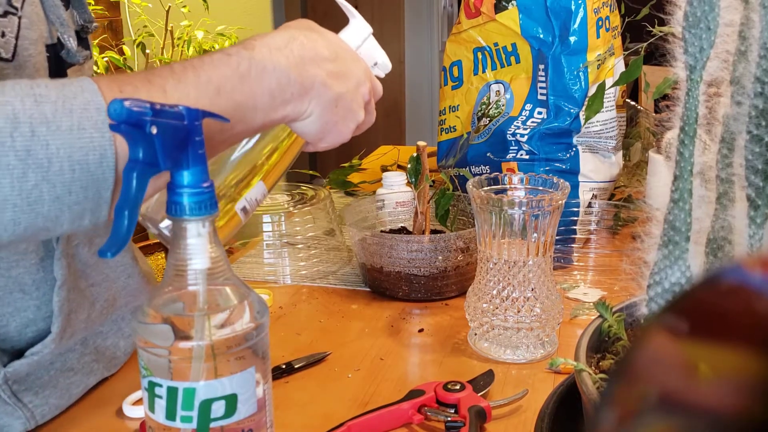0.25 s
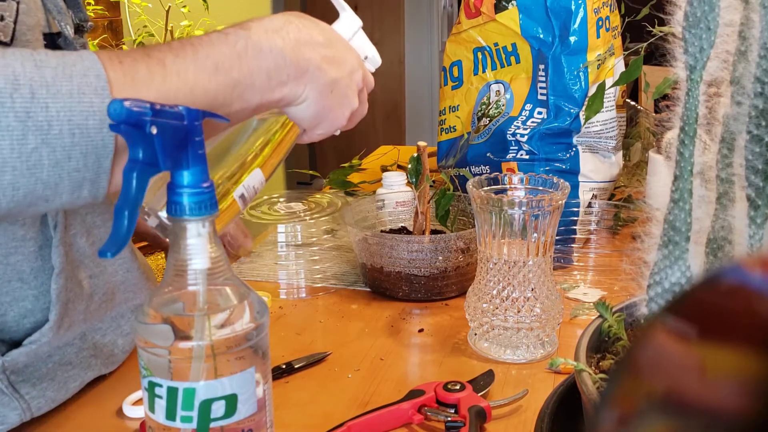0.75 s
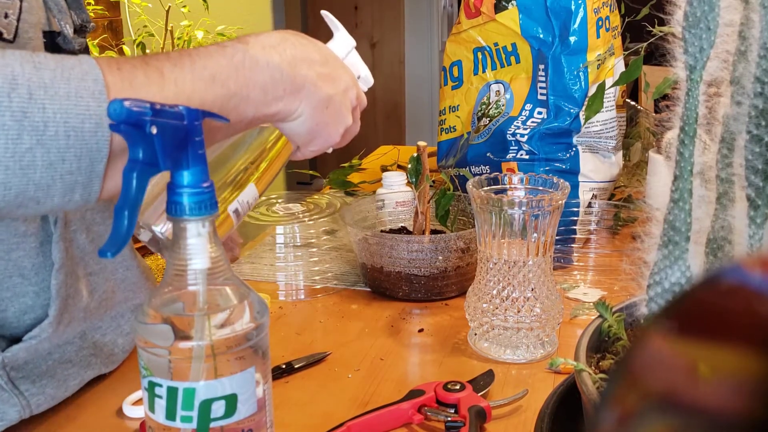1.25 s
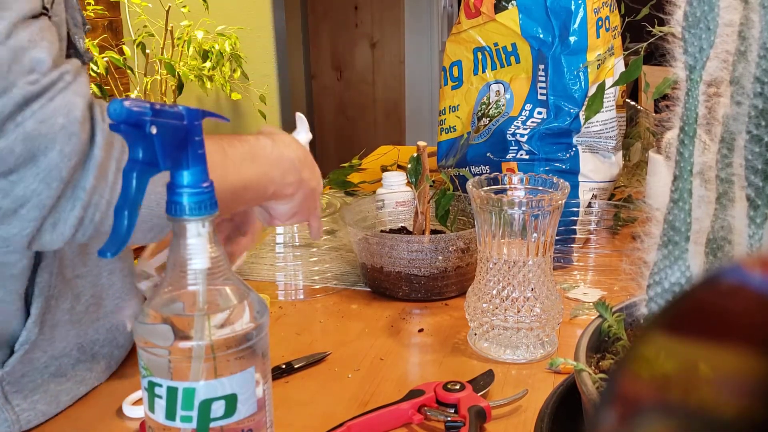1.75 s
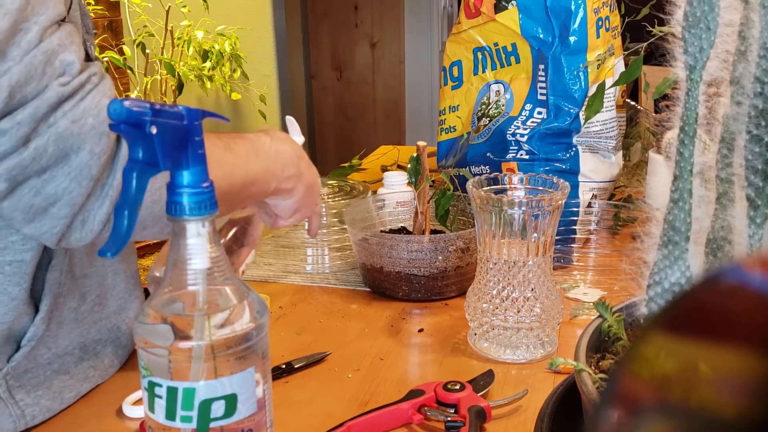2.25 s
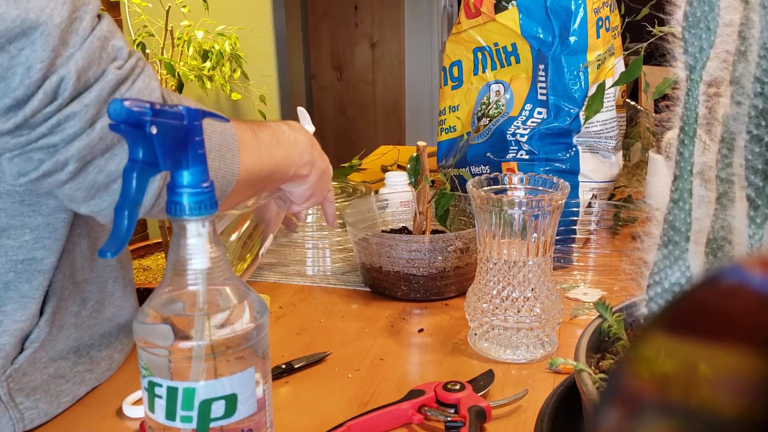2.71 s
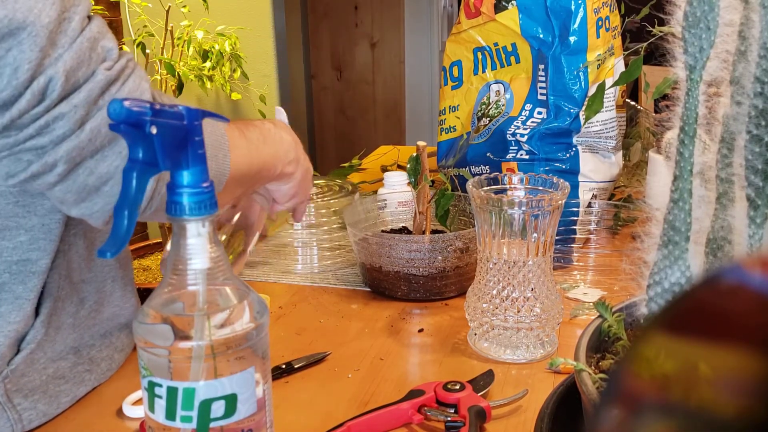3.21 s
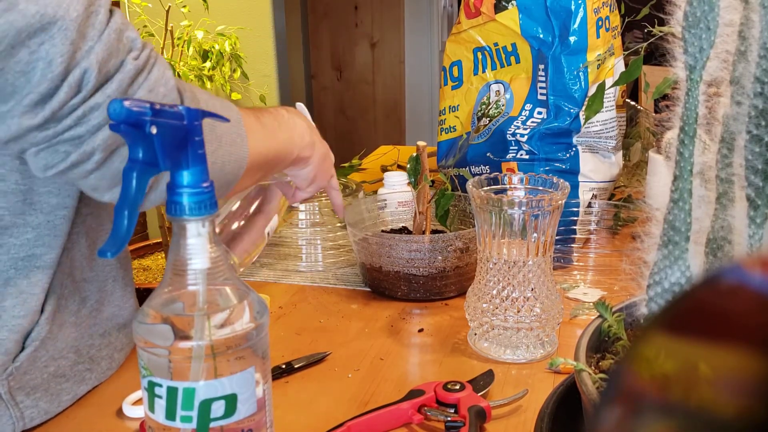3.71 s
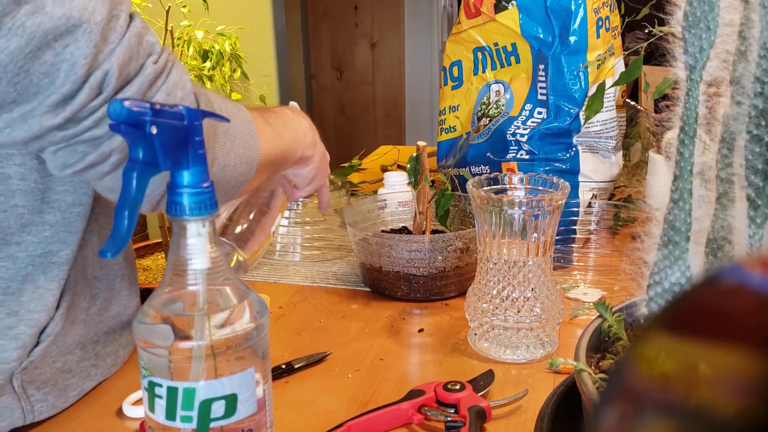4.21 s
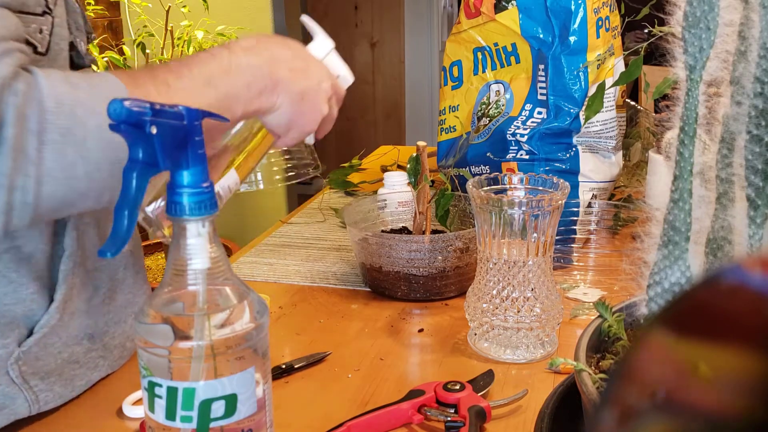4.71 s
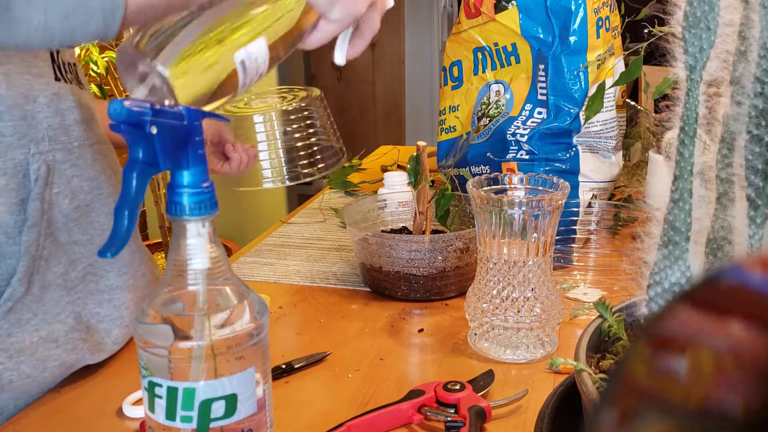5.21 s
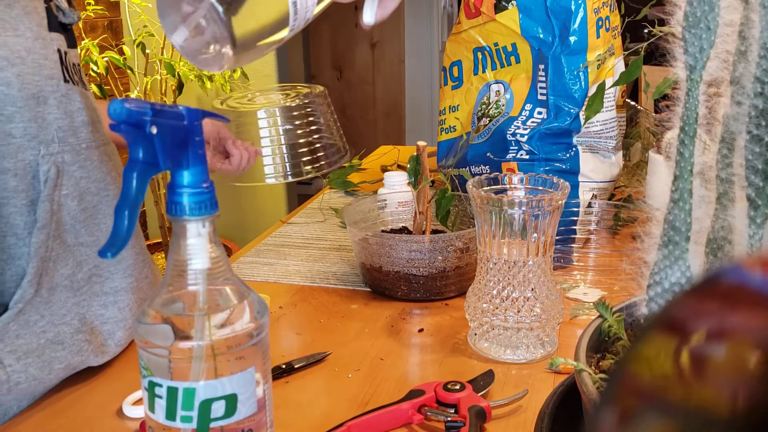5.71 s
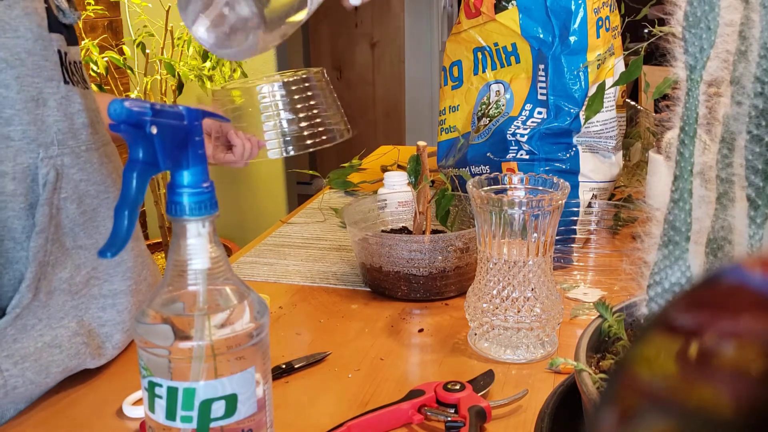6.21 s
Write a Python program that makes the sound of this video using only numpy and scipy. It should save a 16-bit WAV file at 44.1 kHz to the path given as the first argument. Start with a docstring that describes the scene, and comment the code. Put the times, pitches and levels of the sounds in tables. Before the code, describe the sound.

Close by in a small room, a thin plastic lid is dragged over a mat on a table, scraping and knocking with a light, hollow sound while a hand slides over it. The knocks build to a sharp clatter, then thin out. After a faint, breathy squeak, a trigger bottle sprays six quick hisses of mist, with pump ticks and a slight patter of droplets. A low appliance hum runs underneath.

```python
"""A table in a small room, heard from close by through two microphone ports, over a low appliance hum.
From the start a thin plastic lid is dragged over a mat and knocked about, ringing its walls, the air
under it and the table; a hand slides on it, and the hardest knocks come between 2 and 3.2 s.
Near 4.7 s comes a faint, breathy squeak. From 5 s a trigger bottle mists the lid six times: the pump
ticks, the nozzle hisses, droplets patter and the liquid sloshes once. The room answers each sound."""
import sys
import numpy as np
from scipy import signal
from scipy.fft import rfft, irfft
from scipy.io import wavfile
from scipy.ndimage import uniform_filter1d

SR = 44100
rng = np.random.default_rng(int(sys.argv[2]) if len(sys.argv) > 2 else 0)


def store_wav(level_fs):
    """Save 16-bit WAV to argv[1]."""
    pcm = np.round(np.clip(np.atleast_2d(level_fs), -1, 1) * 32767)
    wavfile.write(sys.argv[1], SR, pcm.T.astype(np.int16))


N = 284489
TIME_S = np.arange(N) / SR


def amp(db):
    return 10 ** (np.asarray(db) / 20)


def unit_rms(x):
    return x / np.sqrt(np.mean(x ** 2) + 1e-20)


def curve_at(points, hz):
    """Read a curve along a logarithmic frequency axis."""
    freq_hz, value = np.transpose(points)
    return np.interp(np.log(hz + 1), np.log(freq_hz + 1), value)


def colour(x, spectrum):
    """Causal filter with the given dB spectrum; returns one row a channel."""
    log_gain = np.log(amp(curve_at(spectrum, np.abs(np.fft.fftfreq(4096, 1 / SR)))))
    taps = np.fft.ifft(np.exp(log_gain - 1j * signal.hilbert(log_gain).imag)).real[:2048]
    return signal.oaconvolve(np.atleast_2d(x), taps[None], axes=1)[:, :N]


def ring(x, modes):
    """Sum of damped modes, neighbours of opposite sign."""
    out = np.zeros(len(x))
    for k, (hz, width_hz, db) in enumerate(modes):
        r = np.exp(-np.pi * width_hz / SR)
        feedback = [1, -2 * r * np.cos(2 * np.pi * hz / SR), r * r]
        out += (-1) ** k * amp(db) * signal.lfilter([1 - r, 0, r - 1], feedback, x)
    return out


def grit(spread_db, clump_samples):
    """Noise whose strength jumps about in short clumps."""
    clumps = unit_rms(uniform_filter1d(rng.standard_normal(N), clump_samples))
    return unit_rms(rng.standard_normal(N) * amp(spread_db * clumps))


def envelope(curves, fade_s=0.0053):
    """Gain over time from a list of dB curves, silent outside them."""
    out = np.zeros(N)
    for time_s, level_db in map(np.transpose, curves):
        fade = np.clip(np.minimum(TIME_S - time_s[0], time_s[-1] - TIME_S) / fade_s, 0, 1)
        out += fade * amp(np.interp(TIME_S, time_s, level_db))
    return out


def peak(at_s, rise_db_per_s, fall_db_per_s):
    """Gain that climbs to 1 at a moment and then dies."""
    t = TIME_S - at_s
    return amp(np.where(t < 0, rise_db_per_s * t, -fall_db_per_s * t))


def ramp(start_s, rise_s):
    return np.clip((TIME_S - start_s) / rise_s, 0, 1)


# how alike diffuse sound is at the two ports: freq_hz, likeness
PORT_LIKENESS = [(150, 0.96), (500, 0.6), (1200, 0.25), (3000, 0)]

def diffuse_pair(left, other):
    """The ports sit close together, so the right shares the left's bass but not its treble."""
    likeness = np.clip(curve_at(PORT_LIKENESS, np.fft.rfftfreq(len(left), 1 / SR)), 0, 1)
    right = irfft(likeness * rfft(left) + np.sqrt(1 - likeness ** 2) * rfft(other), len(left))
    return np.array([left, right])


# room tone spectrum: freq_hz, density_db
RUMBLE = [(38, -19.5), (65, -14), (76, -15), (102, -7.5), (140, -13), (190, -14.5), (300, -21),
          (560, -36.5), (2000, -55.5), (7000, -58), (11000, -59), (14000, -48.5)]
# steady motor tones, close neighbours beating: pitch_hz, peak_db
MOTORS = [(50.9, -63), (56.48, -56.5), (59.11, -61), (120.03, -56.5)]
RUMBLE_DB, THROB_S = -55.5, 0.41  # at the throb all the tones are in phase

def appliance_hum():
    """Low drone of the house behind everything: motor tones over a slowly swelling rumble."""
    left, other = (colour(rng.standard_normal(N), RUMBLE)[0] for _ in range(2))
    swell_db = 2.2 * unit_rms(uniform_filter1d(rng.standard_normal(N), size=9000))
    tones = sum(amp(db) * np.cos(2 * np.pi * hz * (TIME_S - THROB_S)) for hz, db in MOTORS)
    return amp(RUMBLE_DB + swell_db) * unit_rms(diffuse_pair(left, other)) + tones


# modes of the lid's walls: pitch_hz, width_hz, level_db
WALL_MODES = [(1384, 220, 1.5), (1735, 310, 0.5), (2310, 660, 1.5), (2640, 430, 3), (3474, 1010, -1),
              (4045, 490, -1.5), (6804, 6600, -11.5)]
# modes of the air under the lid: pitch_ratio, width_hz, level_db
HOLLOW_MODES = [(.87, 97.1, 1.5), (1.004, 76.2, 5.5), (1.17, 90.3, -3.5), (1.501, 140.4, -6)]
# spectrum of the mat's fine hiss: freq_hz, density_db
MAT_HISS = [(3000, -31.5), (6500, -4.5), (16000, 4.5)]
# stretches of faint, even hiss from the mat: start_s, length_s, level_db
RUSTLES = [(0.002, 0.19, -61.5), (0.75, 1.55, -58), (2.194, 0.36, -54)]
# strokes of the lid over the mat: peak_s, rise_s, fall_s, scrape_db, hiss_db, drone_db
DRAGS = [(0.002, 0.0093, 0.06, -46, -72, -41.5), (0.344, 0.004, 0.093, -65, -86, -50.5),
         (0.409, 0.067, 0.14, -49, -52, -45), (0.48, 0.22, 0.012, -74, -49, -60),
         (0.744, 0.015, 0.027, -53, -50.5, -41.5), (1.34, 0.079, 0.097, -65, -56, -53),
         (1.6, 0.16, 0.056, -64, -56, -55.5), (1.844, 0.029, 0.017, -44.5, -29.5, -49),
         (1.903, 0.083, 0.07, -49.5, -75, -47.5), (1.998, 0.044, 0.03, -47.5, -47, -53),
         (2.47, 0.017, 0.32, -74.5, -53, -73.5), (2.627, 0.028, 0.017, -41.5, -31.5, -57),
         (2.72, 0.095, 0.031, -54, -50, -45), (3.468, 0.012, 0.035, -97.5, -54.5, -91),
         (3.908, 0.029, 0.21, -61, -63, -47.5), (3.967, 0.043, 0.02, -54, -60, -60),
         (4.249, 0.22, 0.035, -49.5, -50, -54), (4.331, 0.019, 0.012, -51, -37.5, -55),
         (4.42, 0.022, 0.055, -52, -47, -53), (4.488, 0.094, 0.0083, -57.5, -50, -58)]
STROKE_DB, DRONE_HZ = 20, 430  # a stroke gains STROKE_DB over rise_s and loses it over fall_s

def lid_drags():
    """Fibres of the mat pluck the rim: the walls scrape, a hiss rides on top, the hollow drones."""
    scrape_gain, hiss_gain, drone_gain = sum(
        amp(levels_db)[:, None] * peak(peak_s, STROKE_DB / rise_s, STROKE_DB / fall_s)
        for peak_s, rise_s, fall_s, *levels_db in DRAGS)
    rustle_gain = sum(amp(db) * (ramp(start_s, 0.0069) - ramp(start_s + length_s, 0.0082))
                      for start_s, length_s, db in RUSTLES)
    scrape = unit_rms(ring(grit(3, 120), WALL_MODES))
    hiss = unit_rms(colour(grit(0.54, 120), MAT_HISS)[0])
    drone = unit_rms(ring(grit(3, 400), np.array(HOLLOW_MODES) * [DRONE_HZ, 1, 1]))
    return scrape * scrape_gain + hiss * np.hypot(hiss_gain, rustle_gain) + drone * drone_gain


def blow(contact_s, size):
    """A sharp tap; the contact then builds up in a quick chatter and dies away."""
    age = np.arange(size) / SR / contact_s
    return signal.unit_impulse(size) + rng.standard_normal(size) * age * np.exp(1 - age) / 5


# modes of the table top under the mat: pitch_hz, width_hz, level_db
TABLE_MODES = [(188.9, 9.8, 4.5), (221, 160, -2)]
# knocks on the lid: start_s, blow_db, thud_db, hollow_hz, crack_db
KNOCKS = [(0.3444, -46.5, -61, 470, -63), (0.4208, -31, -25.5, 425, -58), (0.4513, -29.5, -30.5, 441, -21),
          (0.7996, -33, -31.5, 422, -60), (0.854, -31.5, -34, 547, -70), (1.2997, -43.5, -52, 656, -37),
          (2.0783, -10, -26, 444, -2.5), (2.1217, -8, -19.5, 468, -30.5), (2.165, -28.5, -18, 420, -33),
          (2.613, -32, -42.5, 700, -56), (2.6298, -29, -35, 573, -18), (2.7529, -10, -28.5, 545, -40),
          (2.759, -9, -22.5, 353, 1.5), (2.7719, -14.5, -18.5, 433, -12.5),
          (2.8105, -16.5, -18.5, 426.6, -10), (2.8606, -25.5, -26.5, 567, -5.5),
          (2.8899, -16, -16, 537, -0.5), (2.8983, -13, -19, 428, -20.5), (2.956, -27.5, -17.5, 557, -1.5),
          (2.9858, -20.5, -32, 606, -4.5), (3.1138, -11.5, -24.5, 415, -7), (3.1368, -15.5, -24, 431, -10),
          (3.1452, -16.5, -40.5, 393, 1), (3.1528, -16, -27.5, 453, -20.5), (4.0744, -13.5, -27, 468, -5.5),
          (4.3571, -32, -35.5, 790, -72.5)]
TABLE_DB = -13.5  # relative to the blow
FLEX, SPOT_DB = .03, 1.5  # the grip detunes the wall modes; each spot struck favours other modes
DULLING, DULL_ABOVE_HZ = 0.16, 1500  # soft blows lose treble: dB per octave for each dB of blow
CRINKLE, CRINKLE_S = .22, .004  # the thin wall snaps, then crinkles on more softly
CRACK_BODY = .75  # 0 thin, 1 full

def lid_knocks(size=4096):
    """Each blow rings walls, table and hollow, whose pitch is higher when the lid tips off the mat."""
    out = np.zeros(N + size)
    t, impulse = np.arange(size) / SR, signal.unit_impulse(size)
    table = ring(impulse, TABLE_MODES)
    for start_s, blow_db, thud_db, hollow_hz, crack_db in KNOCKS:
        force = blow(contact_s=0.0012, size=size)
        thud = ring(impulse, np.array(HOLLOW_MODES) * [hollow_hz, 1, 1])
        modes = []
        for hz, width_hz, db in WALL_MODES:
            flexed_hz = hz * rng.uniform(1 - FLEX, 1 + FLEX)
            dull_db = DULLING * blow_db * max(np.log2(hz / DULL_ABOVE_HZ), 0)
            modes.append((flexed_hz, width_hz, db + SPOT_DB * rng.standard_normal() + dull_db))
        walls = ring(force, modes)
        crinkle = CRINKLE * rng.standard_normal(size) * np.exp(-t / CRINKLE_S)
        crack = signal.lfilter([1, -2, 1], [1, -CRACK_BODY], force + crinkle)
        layers = [(blow_db, walls), (thud_db, thud), (crack_db, crack), (blow_db + TABLE_DB, table)]
        at = round(start_s * SR)
        out[at:at + size] += sum(amp(db) * x / abs(x).max() for db, x in layers)
    return out[:N]


# friction bands of the hand: pitch_hz, width_hz, level_db
SLIDE_BANDS = [(2003, 470, -2), (2490, 240, -2), (7200, 1500, -5.5)]
# course of the slide: time_s, level_db
SLIDE_LEVELS = [
    [(.74, -57), (.95, -68.5), (1.8, -63.5), (2.0, -60.5)],
]

def hand_slide():
    """A hand slides slowly over the lid: a thin, even hiss, passed twice through each band."""
    hiss = sum(ring(ring(grit(2.5, 2500), [band]), [band]) for band in SLIDE_BANDS)
    return unit_rms(hiss) * envelope(SLIDE_LEVELS)


# bands of the squeak: pitch_hz, width_hz, level_db
SQUEAK_BANDS = [(650, 34, 4), (1550, 150, -7)]
# course of the squeak: time_s, level_db
SQUEAK_LEVELS = [
    [(4.59, -70.5), (4.685, -57.5), (4.735, -83.5), (4.79, -91.5)],
]

def faint_breathy_squeak():
    """Near 4.7 s, a faint, breathy squeak in two bands, around 650 and 1550 Hz."""
    return unit_rms(ring(grit(2.36, 300), SQUEAK_BANDS)) * envelope(SQUEAK_LEVELS)


SPIT_FALL_DB_PER_S, SPIT_SPLUTTER_DB = 600, -20
JET_RISE_S, JET_SWELL_DB_PER_S, JET_STOP_DB_PER_S = 0.0049, 55, 378
SPLUTTER_SWELL_DB_PER_S, SPLUTTER_LAG_S = 68, 0.0051
DRIBBLE_DB, DRIBBLE_FALL_DB_PER_S = -8, 40  # splutter that trails on after the jet

def trigger_pull(start_s, spit_db, wait_s, jet_s, mist_db, splutter_db):
    """Gains of mist and splutter: a spit, a jet that swells until the piston stops, a dribble."""
    open_s = start_s + wait_s
    stop_s = open_s + jet_s
    spit = amp(spit_db) * ramp(start_s, 0.0025) * peak(start_s, 0, SPIT_FALL_DB_PER_S)
    mist = amp(mist_db) * ramp(open_s, JET_RISE_S) * peak(stop_s, JET_SWELL_DB_PER_S, JET_STOP_DB_PER_S)
    surge = peak(stop_s, SPLUTTER_SWELL_DB_PER_S, JET_STOP_DB_PER_S)
    dribble = amp(DRIBBLE_DB) * peak(stop_s, 0, DRIBBLE_FALL_DB_PER_S)
    splutter = amp(splutter_db) * ramp(open_s + SPLUTTER_LAG_S, JET_RISE_S) * (surge + dribble)
    return np.array([spit + mist, amp(SPIT_SPLUTTER_DB) * spit + splutter])


# spectra of the fine mist and the coarse splutter: freq_hz, density_db
MIST = [(3000, -30), (6000, -11), (11000, -2), (16000, 5.5)]
SPLUTTER = [(400, -1), (1200, 0.5), (3000, 3.5), (9000, 2.5)]
# pulls of the trigger: start_s, spit_db, wait_s, jet_s, mist_db, splutter_db, patter_db
PULLS = [(4.98, -39.5, 0.069, 0.028, -38.5, -55, -58.5), (5.267, -29, 0.021, 0.094, -41.5, -60, -83),
         (5.513, -37.5, 0.023, 0.07, -37.5, -51, -59), (5.765, -28.5, 0.029, 0.059, -29.5, -52, -57.5),
         (6.009, -30.5, 0.029, 0.05, -29.5, -54, -55), (6.248, -25, 0.039, 0.051, -37.5, -49.5, -68)]

def nozzle_spray():
    """Liquid tears into droplets at the nozzle: a fine hiss over a coarser splutter."""
    mist_gain, splutter_gain = sum(trigger_pull(*row[:-1]) for row in PULLS)
    mist = unit_rms(colour(grit(2.2, 60), MIST)[0])
    splutter = unit_rms(colour(grit(5.5, 150), SPLUTTER)[0])
    return mist * mist_gain + splutter * splutter_gain


# ticks of trigger and piston: start_s, level_db
TICKS = [(4.986, -36), (5.038, -23), (5.201, -32), (5.338, -24.5), (5.517, -40), (5.523, -20),
         (5.7405, -34), (5.771, -20), (6.011, -25), (6.057, -12.5), (6.088, -16.5), (6.24, -30.5),
         (6.344, -22.5)]

def pump_ticks(size=1024):
    """Plastic parts of the pump snap past each other."""
    out = np.zeros(N + size)
    for start_s, level_db in TICKS:
        at = round(start_s * SR)
        out[at:at + size] += amp(level_db) * np.diff(blow(contact_s=0.00098, size=size), prepend=0)
    return out[:N]


def droplet_patter():
    """Sparse droplets ring the lid's upper wall modes, loudest as each jet ends."""
    drops = rng.standard_normal(N) * (rng.random(N) < .03)
    gain = sum(amp(patter_db) * peak(start_s + wait_s + jet_s, 380, 690)
               for start_s, _, wait_s, jet_s, *_, patter_db in PULLS)
    return unit_rms(ring(drops, WALL_MODES[3:6])) * gain


# course of the gurgle: time_s, level_db
SLOSH_LEVELS = [
    [(5.7, -62), (5.77, -51.5), (5.83, -95)],
]

def bottle_slosh(pitch_hz=685, width_hz=250):
    """Liquid shifts in the tilted bottle with a short, hollow gurgle."""
    return unit_rms(ring(grit(4.9, 300), [(pitch_hz, width_hz, 0)])) * envelope(SLOSH_LEVELS)


# reverberation time of the small room: freq_hz, t60_s
ROOM_DECAY = [(200, 0.7), (530, 0.48), (1390, 0.48), (3680, 0.45), (9700, 0.24)]

def room_tail():
    """Dense reflections reach the ports after 2 ms; each band dies at its own speed."""
    taps = rng.choice([-1., 1.], (2, SR)) * (rng.random((2, SR)) < .15)
    taps *= np.clip((np.arange(SR) / SR - .002) / 0.00028, 0, 1)
    hz, t, bands = signal.stft(taps, SR, nperseg=256)
    decay = amp(-60 * t / curve_at(ROOM_DECAY, hz)[:, None])
    tail = signal.istft(bands * decay, SR, nperseg=256)[1][:, :SR]
    return diffuse_pair(*tail)[:, :SR * 3 // 4] / np.linalg.norm(tail[0])


def room(x, crossfade_hz=37):
    """Two reverb tails alternate rapidly, so the room sounds smooth and does not ring."""
    turn = 2 * np.pi * crossfade_hz * TIME_S
    return sum(signal.fftconvolve((x * share)[None], room_tail(), axes=1)[:, :N]
               for share in (np.sin(turn), np.cos(turn)))


# curtains soak up some of the lid's treble before it returns: tap_gain
CURTAINS = [1, .35]

def scene():
    """At the microphone: the lid close and slightly left, the bottle central with more room on it."""
    lid = lid_knocks() + lid_drags() + hand_slide() + faint_breathy_squeak()
    bottle = nozzle_spray() + pump_ticks() + bottle_slosh() + droplet_patter()
    diffuse = room(amp(-6) * signal.convolve(lid, CURTAINS)[:N]) + appliance_hum()
    left, right = 0.75 * lid + diffuse
    lid_and_hum = np.array([left, np.roll(right, shift=2)])  # these reach the left port first
    return lid_and_hum + amp(-2.5) * bottle + room(amp(1.5) * bottle)


# the microphone's port notch and capsule peak: freq_hz, gain_db
MIC_RESPONSE = [(6500, 0), (8400, -8.5), (10000, -2), (12000, 6), (14000, 3), (15600, -1)]
# its steep drop in the top treble: freq_hz, gain_db
TREBLE_DROP = [(15650, 0), (15900, -36), (17000, -44)]
# imbalance of its two ports: freq_hz, left_minus_right_db
PORT_BALANCE = [(200, -2.5), (2000, -1.5), (8000, 0.5), (13000, -0.5)]
BASS_CUT_HZ, BAND_LIMIT_HZ = 47, 16968

def record(dry):
    """The close microphone: bass cut, its own colour, unequal ports, band limit."""
    bass_cut = signal.butter(6, BASS_CUT_HZ, "highpass", fs=SR, output="sos")
    coloured = colour(colour(signal.sosfilt(bass_cut, dry), MIC_RESPONSE), TREBLE_DROP)
    tilt = amp(curve_at(PORT_BALANCE, np.fft.rfftfreq(N, 1 / SR)) / 2)
    ports = irfft(rfft(coloured) * [tilt, 1 / tilt], N)
    band_limit = signal.firwin(511, BAND_LIMIT_HZ, window=("kaiser", 9), fs=SR)
    return signal.oaconvolve(ports, band_limit[None], "same")


dry = scene()
out = record(dry)
store_wav(out)
```